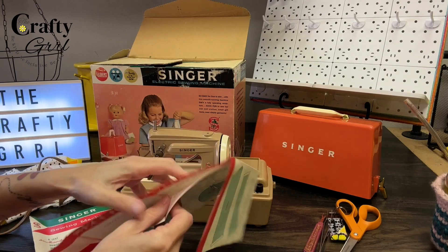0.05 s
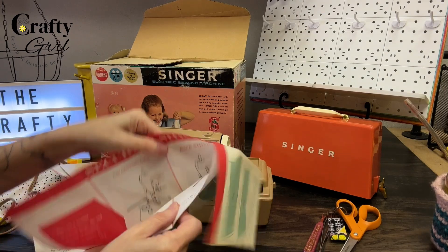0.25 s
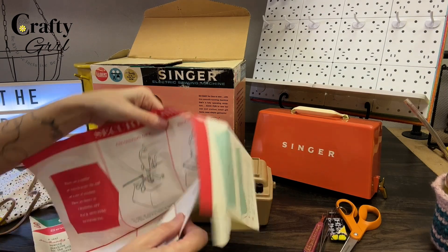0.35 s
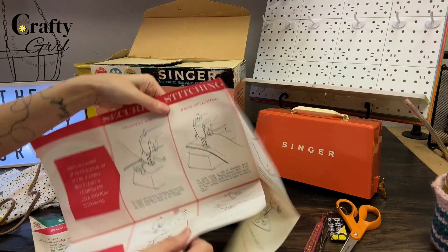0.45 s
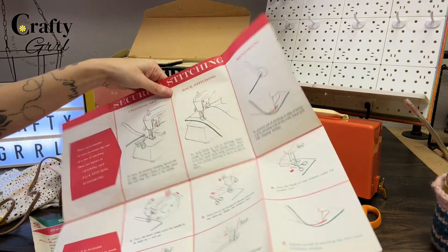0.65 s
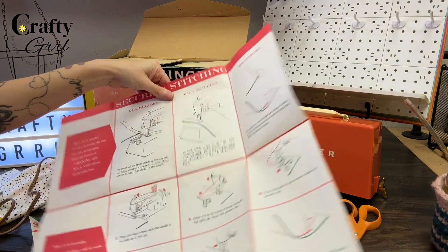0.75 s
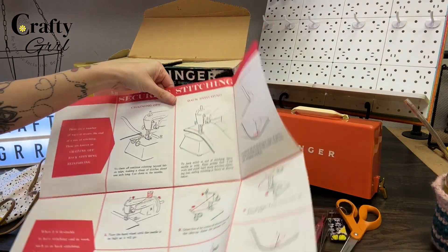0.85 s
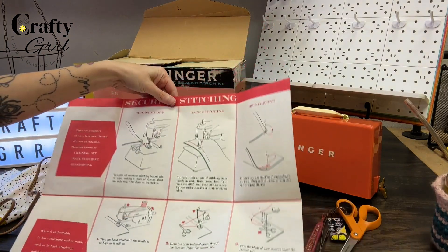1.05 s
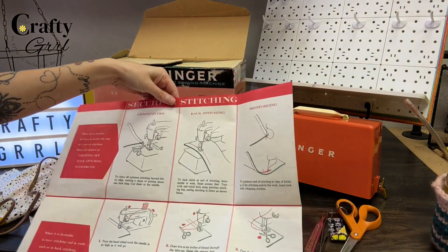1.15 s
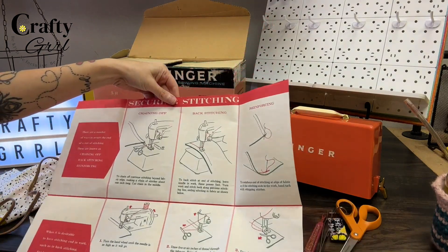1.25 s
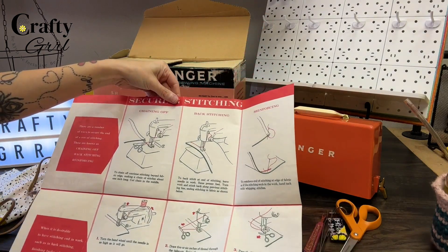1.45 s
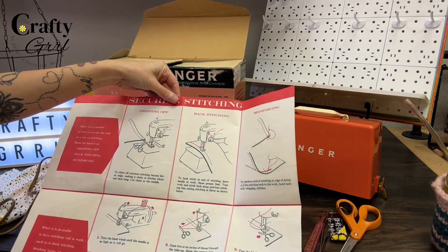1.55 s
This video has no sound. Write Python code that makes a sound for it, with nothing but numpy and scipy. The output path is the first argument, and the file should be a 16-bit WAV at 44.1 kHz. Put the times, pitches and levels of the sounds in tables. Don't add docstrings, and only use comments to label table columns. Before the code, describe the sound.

A large stiff paper sheet is quickly unfolded by hand close to the microphone, crackling and snapping loudly at first, then flopping dully and settling to faint rustles in a quiet small room.

```python
import sys
import numpy as np
from scipy import signal
from scipy.fft import rfft, irfft, next_fast_len
from scipy.io import wavfile
from scipy.ndimage import uniform_filter1d

SR = 44100
rng = np.random.default_rng(int(sys.argv[2]) if len(sys.argv) > 2 else 0)


def voltage_ratio(level):
    return 10 ** (np.asarray(level, float) / 20)


def generate_wav(signal):
    frames = np.transpose(np.atleast_2d(signal))
    scaled = np.clip(frames, -1, 1) * 32767
    pcm = np.round(scaled).astype(np.int16)
    wavfile.write(sys.argv[1], SR, pcm)


N = 70560

# f/Hz, level/dB (per Hz)
ROOM_TONE = [(25, -12), (70, 1), (140, -7), (300, -10.5), (1000, -34), (3000, -37), (16000, -53.5)]
# f/Hz, level/dB (per Hz)
FINGERS = [(900, -30), (1800, -16), (4000, -1.5), (8000, 4.5), (12000, 4.5), (15000, -7.5), (17000, 0)]
# f/Hz, level/dB (per Hz)
CRUMPLE = [(200, -6), (400, -11), (800, 2), (1600, -4), (3000, -5), (6000, -13), (10000, -37)]
# f/Hz, level/dB (per Hz)
AIR = [(25, -25), (60, -7.5), (135, -7), (200, -14), (390, -4.5), (600, -20)]
# t/s, hiss level/dB
SLIDE = [(0, -60), (.1, -65), (.19, -52), (.26, -60), (.335, -54), (.36, -39), (.465, -38), (.55, -66),
         (.645, -54), (.675, -63), (.87, -57), (.975, -64), (1.025, -55.5), (1.228, -78), (1.252, -58),
         (1.325, -57.5), (1.468, -75), (1.485, -92)]
# t/s, crumpling level/dB, air push relative to it level/dB
MOTION = [(0, -59.5, -2), (.1, -69, 2.5), (.17, -52, -8), (.235, -46.5, 5), (.27, -71.5, 20),
          (.33, -53, 5.5), (.37, -34, -14.5), (.44, -32, -5.5), (.545, -41, -3.5), (.62, -41.5, -6),
          (.68, -46.5, 4), (.73, -43.5, 5), (.81, -41.5, -3.5), (.9, -55.5, 4.5), (1.04, -57, 5),
          (1.2, -66, -1), (1.3, -59, 6.5), (1.48, -79.5, -1)]
# f/Hz, width f/Hz, level/dB
SHEET = [(131, 14, -1), (266.7, 37, -4), (390.5, 31.3, 2.5), (481, 180, -8)]
# t/s, peak level/dB, top f/Hz, body level/dB, dying time t/s
FLOPS = [(0.121, -48.5, 2430, -7, 0.068), (.178, -31, 3200, -8, 0.034), (.185, -28, 1770, 5.5, 0.027),
         (.202, -26.5, 3550, -7, 0.1), (0.2434, -17.5, 2280, -18, 0.026), (.276, -31.5, 4240, -10, .02),
         (0.305, -32.5, 3580, -25, .08), (0.451, -13, 2370, 0, 0.017), (.572, -18, 4670, -9.5, 0.11),
         (0.599, -19, 3700, -6, 0.025), (0.6505, -19.5, 1484, -24, 0.016), (0.714, -21, 2600, -7, 0.071),
         (.754, -24.5, 4100, -17, 0.037), (0.819, -17.5, 2660, 0, 0.013), (.862, -28, 3200, 2.5, 0.02),
         (0.979, -44.5, 1740, 7, .05), (1.014, -35.5, 2000, -2, 0.051), (1.098, -41.5, 1500, -9, 0.025),
         (1.2166, -37, 1760, -0.5, 0.047), (1.263, -40, 1800, 2.5, 0.099), (1.326, -32, 1973, 3, 0.084),
         (1.342, -39, 1517, -4, 0.11), (1.5788, -35.5, 2470, -8.5, 0.065), (1.592, -42.5, 1500, -0.5, .03)]
# t/s, peak level/dB, brightness level/dB, body level/dB, dying time t/s
SNAPS = [(0.2128, -16, -5, -23, 0.011), (0.2167, -18, -18, -35, 0.033), (0.2804, -8.5, 1, -11.5, 0.041),
         (0.341, -18.5, 5, -17.5, 0.055), (0.3497, -2.5, -6.5, -17, 0.016),
         (0.3545, -13, -22, -12.5, 0.014), (0.3702, -19, -8.5, 6.5, 0.024), (0.4151, -17.5, 1, -4, 0.027),
         (0.4637, -14, -19.5, -36, 0.09), (0.4702, -17, 9.5, -4, 0.013), (0.5792, -19, -5.5, -28, 0.015),
         (0.5857, -17.5, -13, -2.5, 0.037), (0.6974, -27.5, -30, -21, 0.054), (0.7057, -32.5, -17, 3, 0.1),
         (.7596, -13, -1, -11, 0.0067), (0.7629, -10, -16, -18, 0.028), (0.8254, -13, 1, -9.5, 0.023),
         (0.8288, -16, -33, -13, 0.037), (1.454, -63.5, -1, 0, .07), (1.548, -64, -4, -24, .03)]

ROOM_TONE_DB = -64
ROOM_T60_S, WALL_CUT_HZ, ROOM_DB = 0.22, 7400, -20
GRAINS_PER_S, GRAIN_SPREAD_DB = 2700, -1
CRACKS_PER_S, CRACK_SPREAD_DB, EVEN_S = 9000, 4.5, .003
FIRST_CRACK, FIRST_LAG_S = 5.0, .0006
SNAP_RISE_S, FLOP_RISE_S, HOLD_S = .0004, .0008, .0018
EDGE_LOW_HZ, EDGE_HIGH_HZ, TOP_HZ = 650, 4500, 8500
MID_DB, BRIGHT_DB, BODY_DB = -7, -6, -2
BRIGHT_DIES, BODY_DIES = .55, 1.3
TICK_DB, TICK_DIES, TICK_GROWS = -13, .3, .4
PANEL_TOP_HZ, FLOP_LOW_HZ, FLOP_DB = 970, 514, -9
MIC_LOW_HZ, MIC_TOP_HZ = 47, 16150


def rms_one(x):
    return x / np.sqrt(np.mean(x ** 2) + 1e-20)


def in_time(rows):
    s, *columns = np.transpose(rows)
    return [np.interp(np.arange(N) / SR, s, c) for c in columns]


def drift(rate):
    r = np.exp(-80 * np.pi * rate / SR)
    noise = rng.standard_normal(N // 40 + 2002)
    slow = signal.lfilter([1], [1, -2 * r, r * r], noise)[2000:]
    return np.interp(np.arange(N) / 40, np.arange(len(slow)), rms_one(slow))


def clicks(per_s, spread_db):
    sizes = voltage_ratio(spread_db * np.minimum(rng.exponential(1, N), 4)) * rng.choice([-1, 1], N)
    return rms_one(sizes * (rng.random(N) < per_s / SR) + 1e-9)


def colour(x, spectrum, patchy_db):
    hz, db = np.transpose(spectrum)
    edges = 24 * 2 ** np.arange(0, 9.8, .5)
    out = 0
    for low, high in zip(edges, edges[1:]):
        level = np.interp(np.log(low * high) / 2, np.log(hz), db, left=-90)
        sos = signal.butter(2, [low, high], "band", fs=SR, output="sos")
        band = signal.sosfilt(sos, x)
        sign = (-1) ** round(2 * np.log2(low / 24))
        out = out + sign * voltage_ratio(level + patchy_db * drift(25)) * band
    return rms_one(out)


def passed(x, hz, kind):
    sos = signal.butter(2, hz, kind, fs=SR, output="sos")
    pulse = signal.sosfilt(sos, np.eye(1, 2000)[0])
    return signal.sosfilt(sos, x) / np.sqrt(np.sum(pulse ** 2))


def burst(s, rise, dying):
    age = np.maximum(np.arange(N) / SR - s, 0)
    fall = voltage_ratio(-60 * np.maximum(age - HOLD_S, 0) / max(dying, .003))
    return (1 - np.exp(-age / rise)) * fall


def room_tone():
    return voltage_ratio(ROOM_TONE_DB) * colour(rng.standard_normal(N), ROOM_TONE, patchy_db=2.0)


def room(x):
    size = next_fast_len(N + SR // 2)
    w = 2 * np.pi * np.arange(size // 2 + 1) / size
    dull = 1 / (1 + 1j * w * SR / (2 * np.pi * WALL_CUT_HZ))
    echoes = 0
    for k, lag in enumerate(rng.uniform(.003, .025, 18) * SR):
        loop = voltage_ratio(-60 * lag / SR / ROOM_T60_S) * dull * np.exp(-1j * w * lag)
        echoes = echoes + (-1) ** k * loop / (1 - loop)
    return irfft(rfft(x, size) * echoes, size)[:N]


def handling():
    crumple_db, air_db = in_time(MOTION)
    slide_db, = in_time(SLIDE)
    grains = clicks(GRAINS_PER_S * voltage_ratio(2.6 * drift(30)), GRAIN_SPREAD_DB)
    crumple = colour(grains, CRUMPLE, patchy_db=2.5)
    air = colour(rng.standard_normal(N), AIR + [(1000, -60)], patchy_db=2.0)
    hiss = colour(rng.standard_normal(N), FINGERS, patchy_db=1.0)
    return voltage_ratio(crumple_db) * (crumple + voltage_ratio(air_db) * air) + voltage_ratio(slide_db) * hiss


def panels(x):
    out = 0
    for k, (hz, width, db) in enumerate(SHEET):
        r = np.exp(-np.pi * width / SR)
        zeros = [(1 - r * r) / 2, 0, (r * r - 1) / 2]
        poles = [1, -2 * r * np.cos(2 * np.pi * hz / SR), r * r]
        out = out + (-1) ** k * voltage_ratio(db) * signal.lfilter(zeros, poles, x)
    return out * 9


def crack_stream():
    cracks = clicks(CRACKS_PER_S, CRACK_SPREAD_DB)
    cracks = cracks / np.sqrt(uniform_filter1d(cracks ** 2, int(EVEN_S * SR)) + .05)
    cracks[[int((row[0] + FIRST_LAG_S) * SR) for row in SNAPS + FLOPS]] = FIRST_CRACK
    return cracks


def creases():
    cracks = crack_stream()
    mid, bright, body, tick, flops = np.zeros((5, N))
    for s, db, bright_db, body_db, dying in SNAPS:
        tick_db = db + bright_db + TICK_DB + TICK_GROWS * (db + 18)
        mid += voltage_ratio(db + MID_DB) * burst(s, SNAP_RISE_S, dying)
        bright += voltage_ratio(db + bright_db + BRIGHT_DB) * burst(s, SNAP_RISE_S, dying * BRIGHT_DIES)
        body += voltage_ratio(db + body_db + BODY_DB) * burst(s, FLOP_RISE_S, dying * BODY_DIES)
        tick += voltage_ratio(tick_db) * burst(s, SNAP_RISE_S, dying * TICK_DIES)
    for s, db, top_hz, body_db, dying in FLOPS:
        part = slice(int(s * SR), int(s * SR) + SR // 5)
        flop = (burst(s, FLOP_RISE_S, dying) * cracks)[part]
        dull = passed(flop, [FLOP_LOW_HZ, top_hz], "band")
        dull = passed(dull, 1.4 * top_hz, "low") * np.sqrt(3 * top_hz / SR)
        flops[part] += voltage_ratio(db + FLOP_DB) * dull
        body += voltage_ratio(db + body_db + BODY_DB) * burst(s, FLOP_RISE_S, dying * BODY_DIES)
    crackle = passed(mid * cracks, TOP_HZ, "low") * np.sqrt(2 * TOP_HZ / SR)
    crackle = passed(crackle, [EDGE_LOW_HZ, 1.45 * EDGE_HIGH_HZ], "band")
    edge = passed(bright * cracks, [EDGE_HIGH_HZ, TOP_HZ], "band")
    sharp = passed(tick * cracks, TOP_HZ, "high")
    thud = panels(passed(body * cracks, PANEL_TOP_HZ, "low")) / 5
    return flops + sharp + crackle + edge + thud


def scene():
    paper = creases()
    return (paper + voltage_ratio(ROOM_DB) * room(paper) + handling() + room_tone())[None]


def top_cut(x):
    return signal.sosfilt(signal.butter(12, 16780, fs=SR, output="sos"), x)


def record(dry):
    thin = signal.sosfilt(signal.butter(2, MIC_LOW_HZ, "high", fs=SR, output="sos"), dry)
    mix = signal.sosfilt(signal.cheby2(20, 45, MIC_TOP_HZ, fs=SR, output="sos"), thin)
    return top_cut(mix)


dry = scene()
out = record(dry)
generate_wav(out)
```